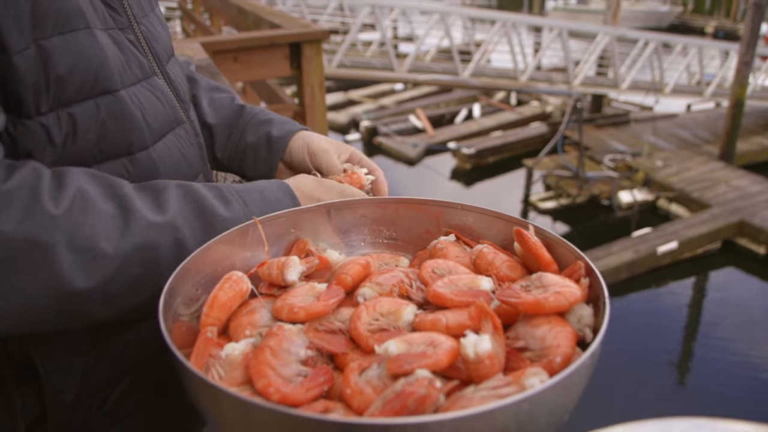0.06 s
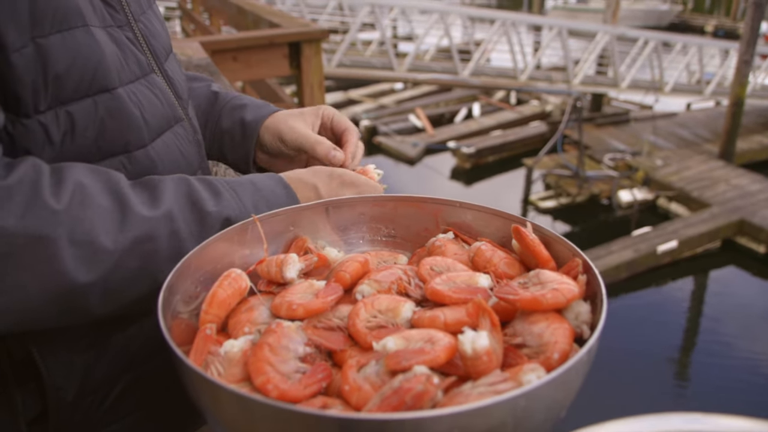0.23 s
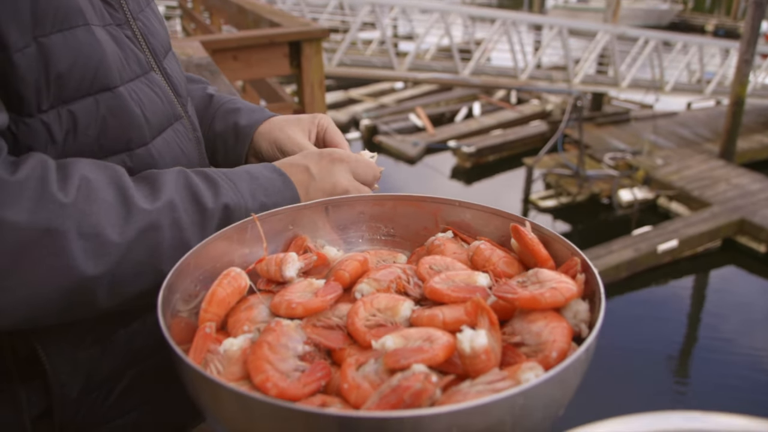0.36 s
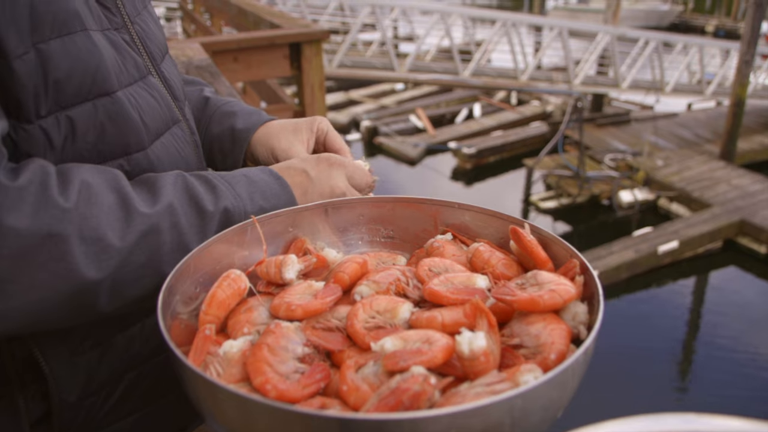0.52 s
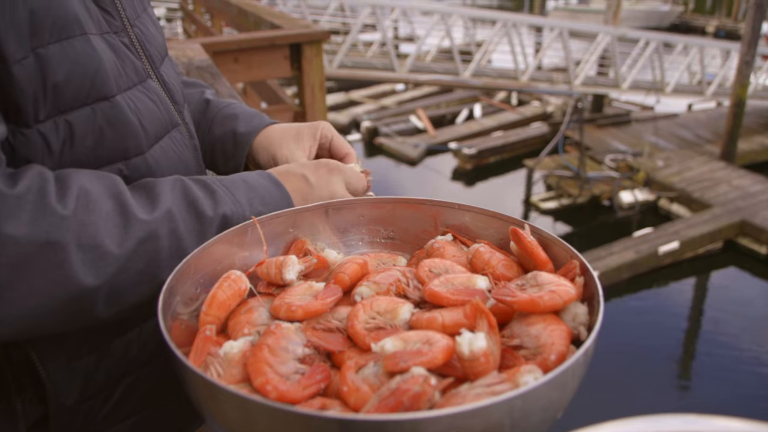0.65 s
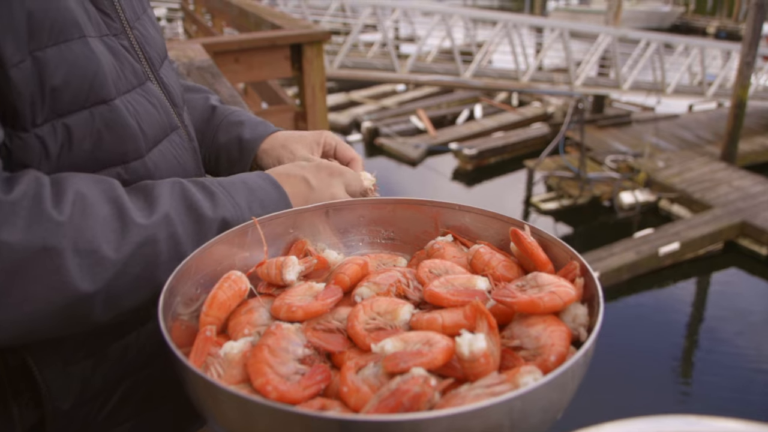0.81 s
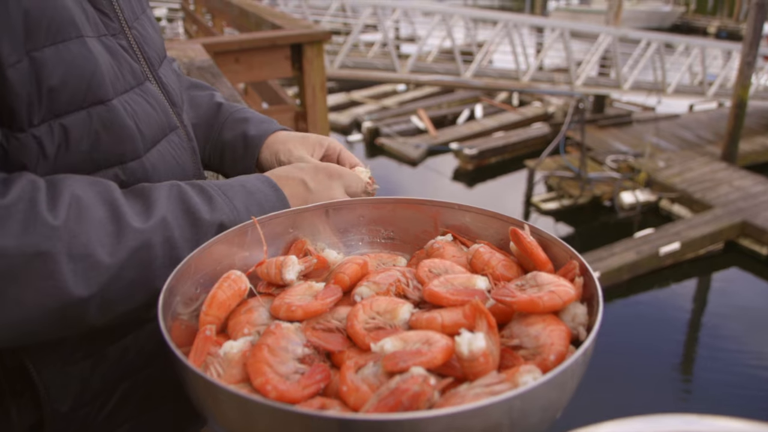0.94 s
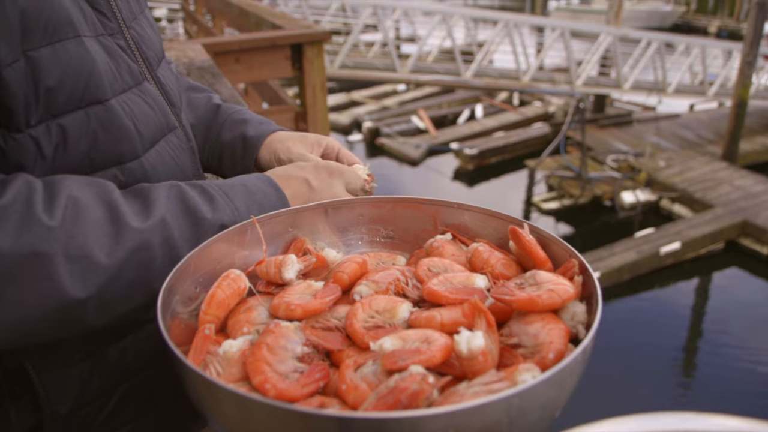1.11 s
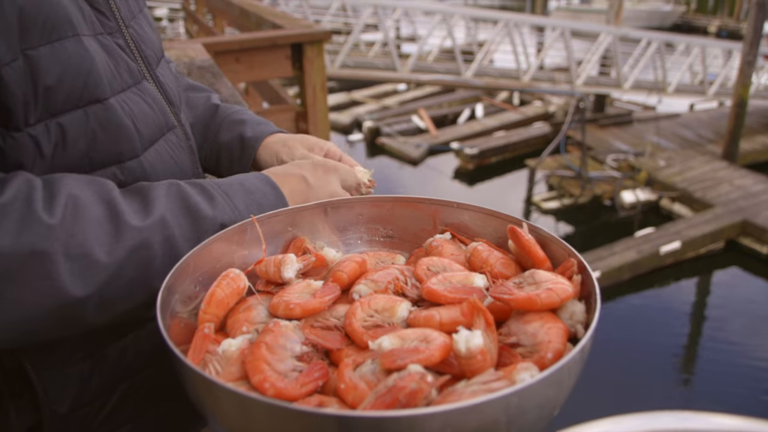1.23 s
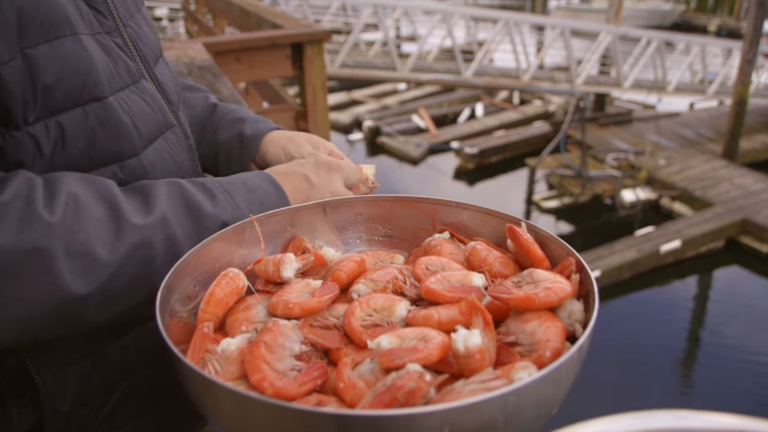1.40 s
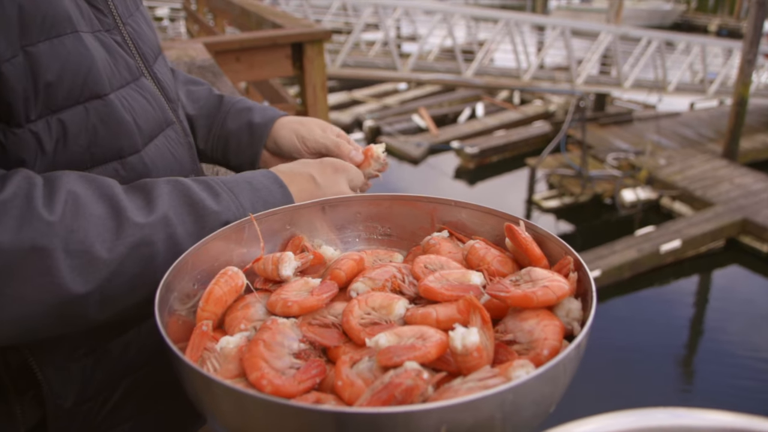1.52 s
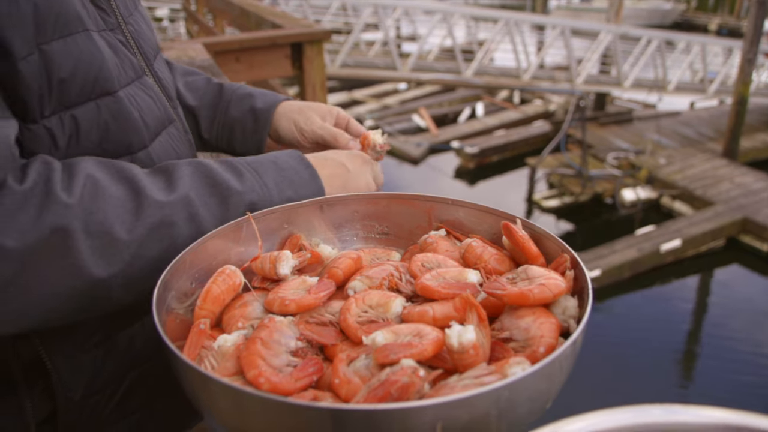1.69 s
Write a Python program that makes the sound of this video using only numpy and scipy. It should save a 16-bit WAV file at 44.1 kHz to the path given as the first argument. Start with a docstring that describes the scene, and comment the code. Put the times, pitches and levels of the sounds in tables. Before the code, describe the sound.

Shrimp shell peeled by hand, one sharp crack then brief crackly tearing, over low outdoor rumble.

```python
"""Small snaps, one sharp crack, then shell tearing away: a shrimp peeled by hand over a steel bowl on a dock.
Each snap is a fracture that rings the stiff shell; each tear is a quick run of tiny ruptures.
The hands bump softly as the shell gives way, and nearby surfaces throw back a short bright tail.
Behind it all are a low wavering hum, harbour rumble, hiss and a thin steady whine."""
import sys
import numpy as np
from scipy import signal
from scipy.fft import rfft, irfft
from scipy.io import wavfile
from scipy.ndimage import uniform_filter1d

SR = 44100
rng = np.random.default_rng(int(sys.argv[2]) if len(sys.argv) > 2 else 0)


def int16_out(signal):
    """Quantize to a 16-bit WAV file."""
    q = np.round(np.clip(np.atleast_2d(signal).T, -1, 1) * 32767)
    wavfile.write(sys.argv[1], SR, q.astype(np.int16))


N = 77175


def amp(db):
    """Decibels to gain."""
    return 10 ** (np.asarray(db) / 20)


def unit(x):
    """Scales to rms 1."""
    return x / np.sqrt(np.mean(abs(x) ** 2) + 1e-20)


def curve_at(points, hz):
    """Reads a curve along log frequency."""
    point_hz, value = np.transpose(points)
    return np.interp(np.log(hz + 1), np.log(point_hz), value)


def add(mix, start_s, sound):
    """Mixes a sound in at its start time."""
    part = mix[max(round(start_s * SR), 0):][:len(sound)]
    part += sound[:len(part)]


def drift(count, size):
    """A random wander of rms 1, smoothed over `size` points."""
    return unit(uniform_filter1d(uniform_filter1d(rng.standard_normal(count), size), size))


def tilt(hz, db_per_octave):
    """Brightens or dulls around 6 kHz; flat below 1 kHz."""
    return amp(db_per_octave * np.log2(np.maximum(hz, 1000) / 6000))


def minimum_phase(gain):
    """The phase that makes a spectrum ring only after its attack."""
    return -signal.hilbert(np.log(np.r_[gain, gain[-2:0:-1]])).imag[:len(gain)]


def harbour():
    """A bed of rumble and hiss with drifting patches and a gentle midrange swell."""
    # Colour of the bed. Each row: frequency in Hz, relative noise density in dB.
    colour = [(20, -16), (32, -18), (42, -16.5), (52, -20), (85, -10.5), (112, -5.5), (160, -10.5),
              (225, -10.5), (380, -15.5), (600, -22), (850, -21.5), (1300, -27), (2100, -33), (3530, -39.5),
              (5010, -41), (5600, -39), (6550, -42.5), (9550, -45.5), (15500, -47.5)]
    # Swell of the midrange. Each row: time in seconds, boost in dB.
    swell = [(0, -0.5), (.45, 0.5), (.62, 1.5), (.7, 0), (.79, 1.5), (.88, 4.5), (.96, -1.5), (1.02, 1),
             (1.32, -1.5), (1.58, 0.5), (1.75, -1)]
    level_db, patch_db, swell_hz, swell_octaves = -56, 1.38, 720, .6
    hz, t, noise = signal.stft(rng.standard_normal(N), SR, nperseg=2048, noverlap=1536)
    patches = uniform_filter1d(rng.standard_normal(noise.shape), size=16, axis=0)
    patches = unit(uniform_filter1d(patches, size=8, axis=1))
    gain = amp(curve_at(colour, hz))
    gain /= np.sqrt(np.mean((gain * (hz > 200)) ** 2))  # the range above 200 Hz sets the level
    midrange = np.exp(-(np.log2((hz + 1) / swell_hz) / swell_octaves) ** 2)
    swell_db = np.outer(midrange, np.interp(t, *np.transpose(swell)))
    bed = noise * gain[:, None] * amp(level_db + patch_db * patches + swell_db)
    return signal.istft(bed, SR, nperseg=2048, noverlap=1536)[1][:N]


def hum():
    """A wavering low hum, likely a distant engine, and two faint steady tones."""
    # Rise and fall of the hum. Each row: time in seconds, level in dB before the trim.
    fader = [(0, -52), (.04, -63), (.09, -48), (.2, -59), (.27, -52), (.38, -52), (.45, -45.5), (.57, -54),
             (.63, -47), (.67, -58), (.71, -45), (.81, -57), (.89, -50), (.97, -55), (1.22, -52),
             (1.37, -58), (1.51, -48), (1.62, -53), (1.69, -46), (1.75, -51)]
    # A faint mid tone and the thin whine. Each row: frequency in Hz, level in dB.
    tones = [(527.6, -78.5), (5534, -74)]
    pitch_hz, wander_hz, trim_db = 117.85, 8, -2
    t = np.arange(N) / SR
    cycles = np.cumsum(pitch_hz + wander_hz * drift(N, size=1200)) / SR
    level_db = np.interp(t, *np.transpose(fader)) + trim_db
    steady = sum(amp(db) * np.sin(2 * np.pi * (hz * t + rng.random())) for hz, db in tones)
    return np.sqrt(2) * (amp(level_db) * np.sin(2 * np.pi * cycles) + steady)


def surroundings(direct, spread):
    """Nearby surfaces return a few distinct echoes, then a lumpy tail whose highs die first."""
    # Slaps off the sleeve, bowl and rail. Each row: delay in seconds, gain in dB.
    echoes = [(.0052, -18), (.0070, -18.5), (.0084, -16), (.0128, -19.5), (0.0166, -21), (0.0196, -16.5),
              (0.0236, -15), (0.0304, -19), (0.0352, -20)]
    # Colour of the diffuse tail. Each row: frequency in Hz, relative level in dB.
    tail_colour = [(700, -10), (1600, -5), (2800, -7.5), (4100, -4.5), (4950, -5), (5700, 5.5),
                   (6400, -4.5), (7000, 1), (8100, -1.5), (9700, -5), (11200, 1), (15500, -3)]
    # Decay of the tail. Each row: frequency in Hz, seconds to fall by 60 dB.
    tail_t60 = [(1000, 0.26), (3000, .25), (5800, 0.2), (8000, 0.15), (15000, 0.14)]
    tail_db, build_s, lump_db = -4.5, .019, 2
    t = np.arange(SR // 2) / SR
    hz, frame_s, bands = signal.stft(rng.standard_normal(len(t)), SR, nperseg=256)
    decay = amp(-60 * np.maximum(frame_s - build_s, 0) / curve_at(tail_t60, hz)[:, None])
    tail = signal.istft(bands * decay, SR, nperseg=256)[1][:len(t)]
    build = np.clip((t / build_s) ** 4, .25, 1) * (t > .002)  # 2 ms of pre-delay
    tail *= build * amp(lump_db * drift(len(t), size=24))
    colour = amp(tail_db + curve_at(tail_colour, np.fft.rfftfreq(len(t), 1 / SR)))
    response = irfft(rfft(tail / np.linalg.norm(tail)) * colour)[:-500]  # drop the wrapped pre-ring
    wet = signal.fftconvolve(spread, response)[:N]
    for delay_s, db in echoes:
        add(wet, delay_s, amp(db) * direct)
    return wet


def hands():
    """Dull bumps of the hands as the shell gives way: low noise that swells and fades."""
    # Hand bumps. Each row: start in seconds, level at the crest in dB.
    bumps = [(0.417, -60.5), (.455, -55.5)]
    band_hz, rise_s = [76.5, 250], .016
    age = np.arange(SR // 5) / SR / rise_s
    band = signal.butter(2, band_hz, "band", fs=SR, output="sos")
    out = np.zeros(N)
    for start_s, db in bumps:
        thud = unit(signal.sosfilt(band, rng.standard_normal(len(age))))
        add(out, start_s, amp(db) * age * np.exp(1 - age) * thud)
    return out


def tear(level_db, bright_db, fizz_db, length_s):
    """Thin shell parts from the meat in a quick run of tiny uneven ruptures."""
    # Colour of a tear. Each row: frequency in Hz, relative level in dB.
    colour = [(800, -36), (2400, -28), (3500, -11), (4300, 0.5), (5400, -1), (6100, 1), (7500, 0),
              (8500, 3.5), (9700, 4.5), (11000, -10), (12000, -1.5), (14500, -1), (15500, 6.5)]
    trim_db, grain_db, fizz_from_hz = -19.5, 6, 10600
    t = np.arange(2048) / SR
    hz, age = np.fft.rfftfreq(len(t), 1 / SR), t / length_s
    ruptures, sizes = rng.standard_normal((2, len(t)))
    run = ruptures * amp(grain_db * sizes) * age ** 2 * np.exp(-2 * age)
    fizz_shelf = np.clip((hz - fizz_from_hz) / 1000 + .5, 0, 1)
    gain = amp(curve_at(colour, hz) + fizz_db * fizz_shelf) * tilt(hz, bright_db)
    sound = irfft(rfft(run) * gain * np.exp(1j * minimum_phase(gain)))
    return amp(trim_db + level_db) * sound / np.linalg.norm(sound)


def snap(level_db, bright_db, fracture_s, blur):
    """A fracture runs through the shell, setting off its resonances at slightly different instants."""
    # Resonances of the shell held in the fingers.
    # Each row: frequency in Hz, width in Hz before scaling by blur, relative level in dB.
    modes = [(1610, 310, -9), (2150, 140, -10.5), (2870, 890, -9), (3650, 450, -9.5), (4150, 210, -4),
             (4983, 360, 1), (5480, 470, -5.5), (6270, 344, 0), (6970, 640, -7), (8240, 490, -8.5),
             (9730, 470, -11), (10440, 260, -17.5), (11800, 410, -21.5), (13200, 2000, -25),
             (15300, 670, -25)]
    trim_db, low_cut_hz = 1.5, 1220
    hz = np.fft.rfftfreq(2048, 1 / SR)
    power = sum(amp(2 * db) / (1 + ((hz - mode_hz) / (.97 * blur * width)) ** 2) ** 3
                for mode_hz, width, db in modes)
    power /= 1 + (low_cut_hz / (hz + 1)) ** 12  # a small shell radiates little bass
    gain = np.maximum(unit(np.sqrt(power) * tilt(hz, bright_db)), .01)
    delay_s = fracture_s * np.maximum(.75 + .28 * drift(len(hz), size=16), .1)
    phase = minimum_phase(gain) - 2 * np.pi * np.cumsum(delay_s) * hz[1]
    sound = irfft(gain * np.exp(1j * phase))
    return amp(trim_db + level_db) * sound[:len(hz)]


def peeling():
    """The shell snaps, then tears, heard directly and off the surroundings."""
    # Stiff shell snapping. Each row: start in seconds, relative level in dB,
    # brightness in dB per octave, time scale of the fracture in seconds.
    snaps = [(0.0465, -31.5, -3, .0011), (.0500, -33.5, -6, 0.0012), (.0705, -41, -6, .0016),
             (.1430, -42.5, -7, 0.001), (.1495, -42, -5, .0014), (.1723, -25.5, -3, .0011),
             (0.2308, 0.5, 1.5, .0013), (.2329, -18, -7, 0.00078), (.3005, -24, 3, 0.001005),
             (0.3122, -31, 0, .001), (.3270, -33.5, -2, 0.00067), (.3500, -36, -7, 0.000985)]
    # Thin shell tearing. Each row: start in seconds, relative level in dB,
    # brightness in dB per octave, top-end fizz in dB, time to the crest in seconds.
    tears = [(.3885, -12, 3, 6, 0.00053), (0.4217, -12, -10, -4, .002), (0.4262, -10.5, -15, 1, 0.001),
             (0.4294, -11, -12, 1, 0.004), (0.4462, -4.5, -11.5, 10, 0.0025), (0.4513, 2, 1, -5.5, 0.0017),
             (0.457, 5, -2.5, 7, 0.00088), (0.459, -8, -3, 1, 0.0013), (0.465, -10, 4, 3, 0.0011),
             (.4660, -3.5, -4.5, 2, 0.0016), (0.468, -2, -4, 2, 0.0013), (.7808, -21, -2, -2, 0.0013),
             (0.88, -7.5, 0.5, -10, 0.0011), (0.895, -30, 0, -12, .0012), (0.992, -20.5, 1, 1, 0.00074)]
    tear_send_db = -2.5
    direct, spread = np.zeros((2, N))
    for start_s, *shape in snaps:
        add(direct, start_s, snap(*shape, blur=.87))
        # Sound sent in all directions has broader resonances than the direct path.
        add(spread, start_s, snap(*shape, blur=2.3))
    for start_s, *shape in tears:
        rip = tear(*shape)
        add(direct, start_s, rip)
        add(spread, start_s, amp(tear_send_db) * rip)
    return direct + surroundings(direct, spread)


def scene():
    """The peeling in front of the harbour, in mono."""
    return (peeling() + harbour() + hum() + hands())[None]


def record(dry):
    """A steep low-pass takes off the air above 15.9 kHz."""
    low_pass = signal.firwin(401, 15900, window=("kaiser", 8), fs=SR)
    return signal.oaconvolve(dry, low_pass[None], "same")


dry = scene()
out = record(dry)
int16_out(out)
```